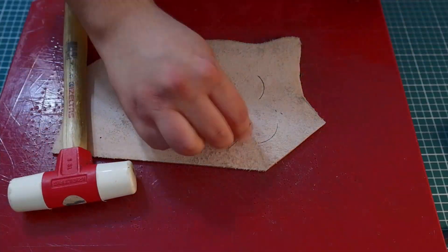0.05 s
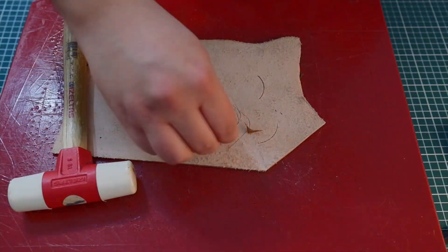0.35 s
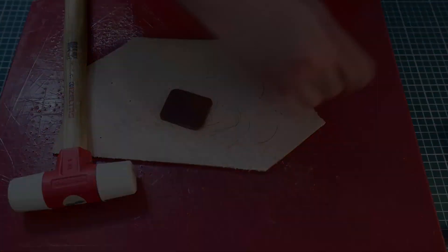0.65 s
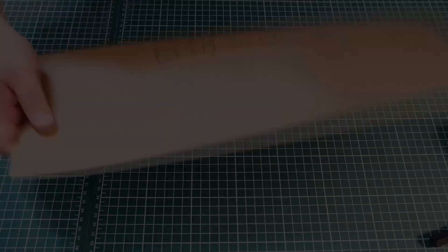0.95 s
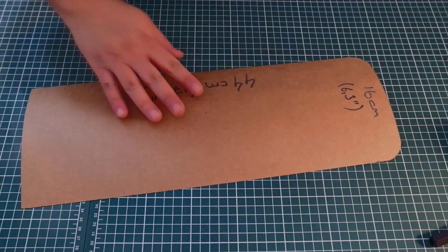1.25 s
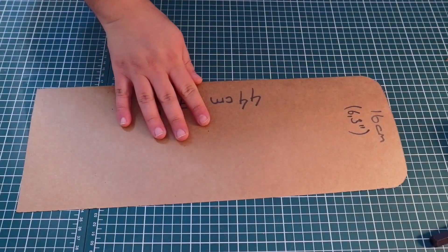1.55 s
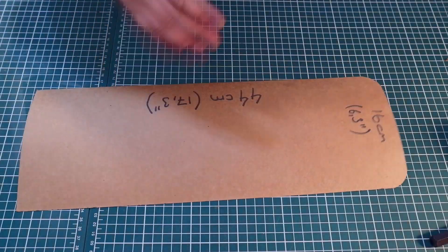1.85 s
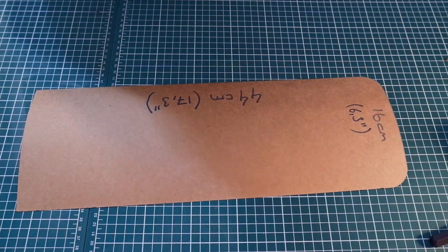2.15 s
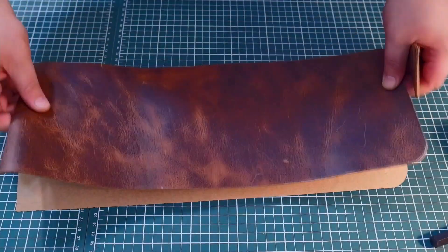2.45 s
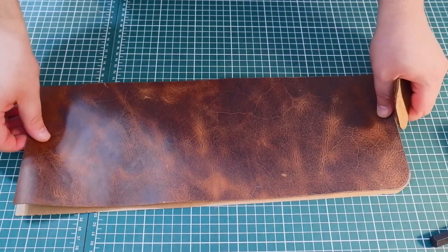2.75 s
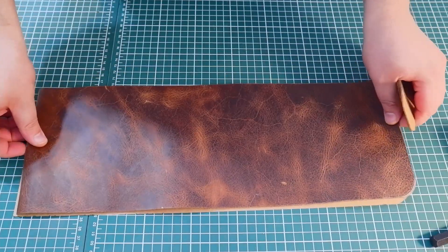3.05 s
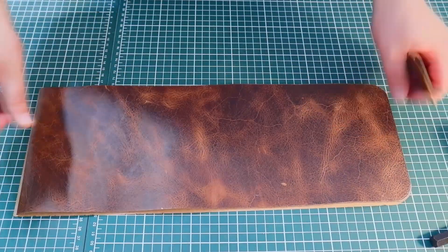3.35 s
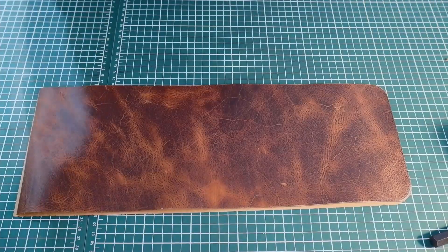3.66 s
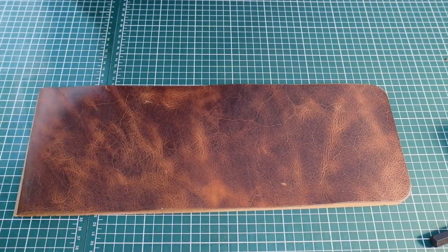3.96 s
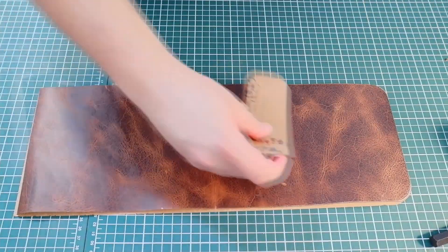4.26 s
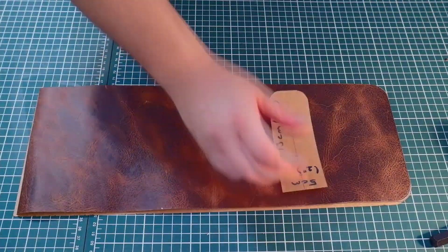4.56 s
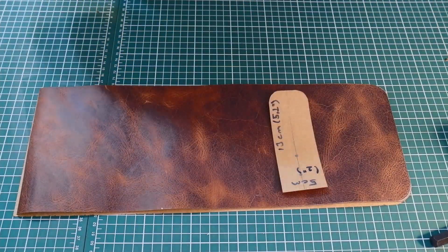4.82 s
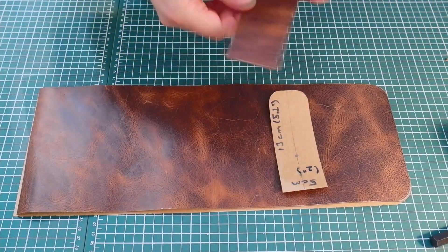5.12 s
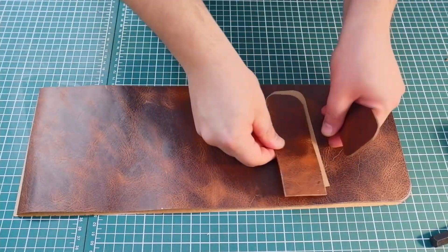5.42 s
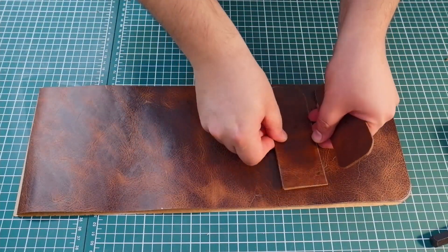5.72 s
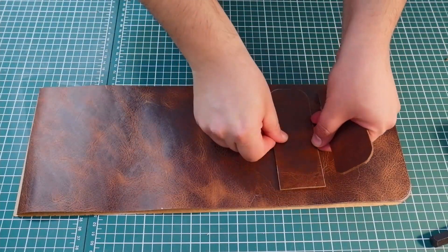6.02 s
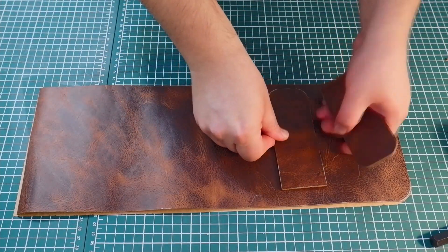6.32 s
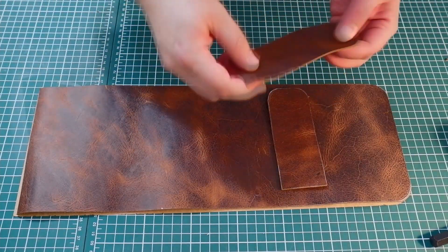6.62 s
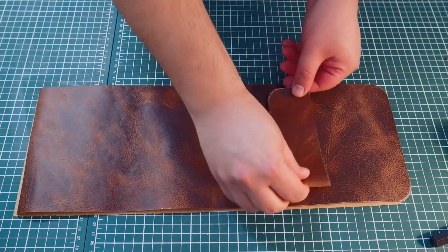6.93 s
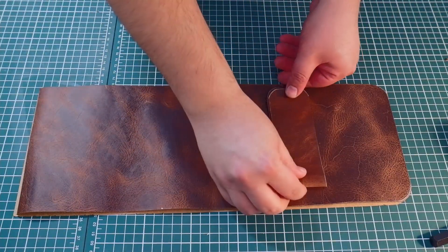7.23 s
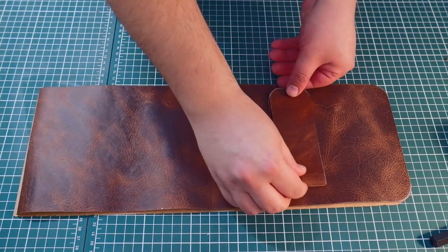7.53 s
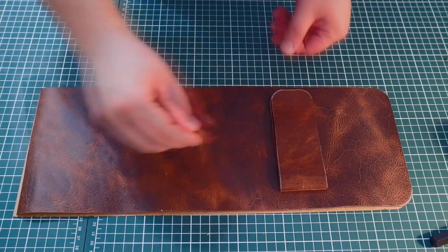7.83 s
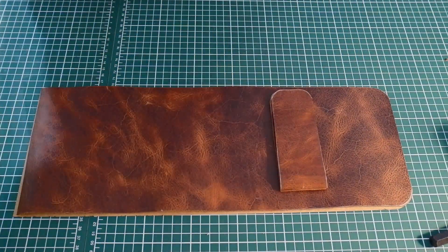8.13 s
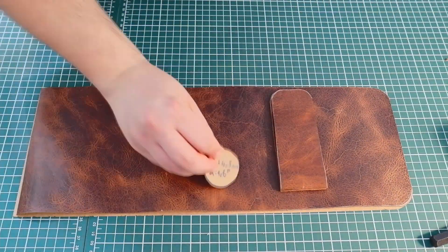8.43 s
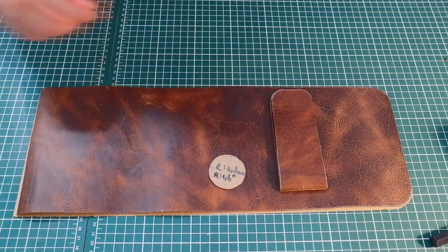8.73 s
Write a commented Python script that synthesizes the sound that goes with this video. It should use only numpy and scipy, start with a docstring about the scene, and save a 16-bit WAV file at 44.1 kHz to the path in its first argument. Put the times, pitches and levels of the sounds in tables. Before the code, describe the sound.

Soft scratching, one sharp slap of card, then quiet taps and rubs of leather and a small bright snap, over hiss and hum.

```python
"""At a leather workbench in a small room, an awl scratches lines on a cutting board.
A stiff card pattern slaps onto the mat, rings briefly and is slid into place. Leather pieces are laid
on it, nudged and smoothed with small taps, and a little card disc snaps down from the fingers.
Slides are fibres catching and letting go; each touch is a quick cluster of tiny hits.
Steady microphone hiss and a low hum lie under it all, spread wide between left and right."""
import sys
import numpy as np
from scipy import signal
from scipy.fft import rfft, irfft, next_fast_len
from scipy.io import wavfile
from scipy.ndimage import map_coordinates

SR = 44100
rng = np.random.default_rng(int(sys.argv[2]) if len(sys.argv) > 2 else 0)


def file_out(sig):
    """Save sig as 16-bit WAV at sys.argv[1]."""
    # one column per channel
    cols = np.atleast_2d(sig).T
    # limit, then scale
    lim = np.clip(cols, -1, 1)
    pcm = np.round(lim * 32767).astype(np.int16)
    wavfile.write(sys.argv[1], SR, pcm)


N = 396018

# tone colour (how strong each pitch is) of the background hiss: f/Hz, level/dB
HISS_COLOUR = [(20, -7.5), (60, -5.5), (125, 0), (160, 0.5), (225, 0), (400, -3), (700, -6), (1300, -9),
               (2000, -11), (5000, -12), (8700, -13.5), (9600, -14.5), (15800, -14)]
# how the low hum comes and goes: t/s, level/dB
HUM_LEVELS = [(0, -60.5), (.5, -62), (.75, -87), (2.05, -68.5), (3.3, -86), (4.1, -63.5), (4.8, -79.5),
              (5.4, -67.5), (6.1, -68), (6.7, -76.5), (9, -70)]
# hands and pieces thump the bench top: t/s, f/Hz, level/dB
BUMPS = [(.012, 229, -52.5), (.12, 34, -62), (0.929, 190, -48.5), (1.101, 104, -55), (1.189, 198, -58),
         (2.317, 387, -52.5), (2.812, 433, -57), (3.217, 413, -51.5), (3.283, 298, -46.5), (3.93, 207, -57),
         (4.158, 110, -60), (5.447, 330, -54), (5.767, 338, -57.5), (5.99, 330, -56), (6.213, 290, -57),
         (8.196, 100, -56.5), (8.25, 300, -55.5), (8.684, 69, -68)]
# the awl, a sheet or a hand slides: fastest t/s, half length/s, level/dB, brightness/dB, ring f/Hz
STROKES = [(0.179, 0.35, -54.5, 16, 4070), (0.249, 0.57, -59, -22, 524), (.569, 0.078, -55.5, 8, 2550),
           (0.818, 0.16, -56.5, 0, 4200), (.985, 0.095, -52, -8, 620), (1.136, 0.076, -38.5, -3, 1130),
           (1.199, .12, -36.5, -13, 790), (1.378, .042, -35.5, -10, 1150),
           (1.409, 0.063, -32.5, -1.5, 2160), (1.457, .06, -35, -3, 2530), (1.924, .16, -54, -13, 1390),
           (2.285, 0.17, -54.5, 4, 695), (2.61, .11, -44.5, -16, 910), (2.73, .16, -51, -3, 1080),
           (2.904, 0.088, -54, -1, 1120), (3.121, .09, -50, -5, 1170), (3.667, 0.11, -55.5, 0, 3000),
           (3.852, .22, -48.5, 18, 4800), (3.919, .14, -46.5, -9, 2160), (4.028, 0.063, -48, 0, 940),
           (4.218, 0.14, -47, 16, 13500), (4.463, .14, -46.5, 11.5, 3230), (4.519, 0.078, -48, 5, 8500),
           (4.642, 0.24, -59.5, 6, 7000), (5.513, 0.47, -60.5, 10, 1200), (6.66, 0.24, -58.5, 14, 13500),
           (7.655, 0.079, -53.5, -7, 1340), (8.137, 0.099, -51, -2, 4500), (8.25, 0.26, -55.5, -6, 1040),
           (8.254, .1, -46.5, 19, 13300)]
# tone colour of sliding: f/Hz, level/dB
SLIDE_COLOUR = [(180, -55), (300, -9), (461, -16), (922, -2.5), (1490, -0.5), (1590, -2.5), (1780, -2),
                (2140, -1.5), (3450, -2), (3870, -4), (5660, -4.5), (7250, -6.5), (8990, -8), (10800, -19),
                (15500, -19)]
# light, edgy contacts favour treble, flat, padded ones bass: f/Hz, share of the brightness added there
BRIGHTNESS_TILT = [(500, -0.55), (6000, .45), (12000, 0.63)]
# fingers, card and leather touch down: t/s, level/dB, brightness/dB, ring f/Hz
TAPS = [(.925, -45, -13.5, 597), (1.157, -35, -8, 1610), (1.219, -36.5, -21, 1550), (1.53, -51, 2, 1580),
        (1.617, -54.5, 9, 3000), (2.092, -51.5, 2, 950), (2.14, -54, 0, 1570), (2.452, -52, 1, 447),
        (2.579, -46, -16, 920), (2.858, -50, -2, 1020), (3.006, -48.5, -16, 910), (3.151, -42, -16.5, 1240),
        (3.281, -40, -3, 630), (3.976, -47.5, -4, 740), (4.113, -47.5, -4, 1630), (4.153, -37, -1, 2660),
        (4.286, -51, -2, 5400), (4.399, -44, -6, 2740), (5.488, -54.5, -3, 1300), (5.566, -54.5, -5, 1500),
        (5.989, -54.5, 2, 380), (6.088, -54, -3, 320), (6.186, -54, 12, 4100), (6.279, -55, 7, 1080),
        (6.403, -56.5, -1, 1280), (6.62, -54, 16, 2930), (7.314, -53, -15, 3170), (8.274, -42, 17, 4020),
        (8.524, -44, -3.5, 3230)]
# tone colour of a tap: f/Hz, level/dB
TAP_COLOUR = [(35, -41), (60, -6), (394, -6.5), (1020, 2.5), (1420, 1), (1630, -2.5), (1910, 2),
              (2150, -2.5), (2980, 1), (3760, -3.5), (4320, -2.5), (6560, -5), (8870, -4), (10900, -10.5),
              (15500, -19)]
# borders between four bands, called thud, knock, tap and tick from low to high: f/Hz
BAND_EDGES = [450, 1500, 4500]
# the card lands edge first, then flat: t/s, time to fade 60 dB/s, thud/dB, knock/dB, tap/dB, tick/dB
CARD_HITS = [(1.0674, 0.078, -48, -37, -41, -51), (1.075, 0.053, -41.5, -27.5, -33.5, -28.5),
             (1.0842, 0.044, -51, -27.5, -29.5, -37)]
# tone colour of the card: f/Hz, level/dB
CARD_COLOUR = [(60, -30), (110, -16), (220, -12), (480, -20), (820, 7), (1150, 1), (1500, -12), (2700, -13),
               (4000, -28), (5200, -19), (6300, -9), (7400, -22), (8400, -14), (10500, -28), (15500, -30)]
# the card's two flat blows on the mat: t/s, level/dB
CARD_BLOWS = [(1.0768, -25.5), (1.0878, -25)]
# tones that card and mat ring with: f/Hz, level/dB added to the blow's, time to fade 60 dB/s
CARD_TONES = [(608, -16, .09), (800, -1, .06), (915, 0, .062), (1100, -3, .055), (1170, -8, .05),
              (1645, -12, .06), (2100, -14, .07), (2660, -11, .06), (5190, -15, .08), (6200, -12, .06),
              (8180, -16, .07)]
# the disc slips, snaps down and settles: t/s, time to fade 60 dB/s, thud/dB, knock/dB, tap/dB, tick/dB
DISC_HITS = [(8.569, 0.062, -70, -69, -44, -45), (8.5795, 0.063, -60, -40.5, -36, -28.5),
             (8.584, 0.044, -39.5, -41, -59, -41), (8.588, 0.094, -50.5, -66, -43, -40),
             (8.6, 0.11, -49, -60, -50, -57)]
# tone colour of the disc: f/Hz, level/dB
DISC_COLOUR = [(60, -22), (120, 4), (420, -11), (640, -14), (880, 7), (1200, -23), (1800, -10.5),
               (2900, -22), (4250, 0.5), (5200, -2), (8000, 4), (12000, -5), (14300, 3), (15800, -9)]
# how long the room echoes: f/Hz, time to fade 60 dB/s
ROOM_FADE = [(150, 0.12), (1000, 0.3), (12000, 0.18)]

TOP_HZ = 15800  # upper limit of the treble
LEAD_S = 0.025  # a contact starts this long before its peak
GRAIN_DB = 2.3  # unevenness from fibre to fibre


def amp(db):
    """Turn decibels into a factor to multiply by."""
    return 10 ** (np.asarray(db) / 20)


def rms(x):
    """The average strength (root mean square) of each channel."""
    return np.sqrt(np.mean(x ** 2, axis=-1, keepdims=True) + 1e-30)


def unit(x):
    """Scale each channel to an average strength of 1."""
    return x / rms(x)


def along(points, hz):
    """Read between the rows of a (frequency, value) table, with octaves evenly spaced."""
    freqs, values = np.transpose(points)
    return np.interp(np.log(hz + 1), np.log(freqs + 1), values)


def wobble(n, rate):
    """A smooth curve, n samples long, through `rate` random points a second."""
    points = rng.standard_normal(int(n * rate / SR) + 4)
    return map_coordinates(points, [np.arange(n) * rate / SR])


def filtered(x, response):
    """Make each frequency in x louder or softer by the factor response(hz)."""
    n = x.shape[-1]
    size = next_fast_len(n + 4096)
    return irfft(rfft(x, size) * response(np.fft.rfftfreq(size, 1 / SR)), size)[..., :n]


def add(track, s, sound):
    """Mix a stereo sound into the track, starting at s seconds."""
    start = max(round(s * SR), 0)
    part = sound[:, :N - start]
    track[:, start:start + part.shape[1]] += part


def tinted(base, bright_db, ring_hz, ring_db, ring_octaves):
    """A material's tone colour, made brighter or duller, with a peak where it rings."""
    def colour(hz):
        peak = ring_db / (1 + (np.log2((hz + 1) / ring_hz) / ring_octaves) ** 2)
        return along(base, hz) + bright_db * along(BRIGHTNESS_TILT, hz) + peak
    return colour


def background(hiss_db, hum_hz, hum_width_hz, waver_db):
    """Room murmur and microphone hiss, unrelated left and right, with a fuzzy, wavering hum."""
    hiss = filtered(rng.standard_normal((2, N)), lambda hz: amp(along(HISS_COLOUR, hz)) * (hz < TOP_HZ))
    hum = filtered(rng.standard_normal((2, N)), lambda hz: 1 / (1 + ((hz - hum_hz) / hum_width_hz) ** 2))
    hum_db = np.interp(np.arange(N) / SR, *np.transpose(HUM_LEVELS)) + waver_db * wobble(N, 12)
    return amp(hiss_db) * unit(hiss) + amp(hum_db) * unit(hum)


def bumps(relative_width, swell_cycles):
    """Soft pressure on the bench top makes a swell of low noise: the lower, the longer."""
    out = np.zeros((2, N))
    t = np.arange(SR // 2) / SR
    for s, centre_hz, db in BUMPS:
        start = max(s - t[-1] / 2, 0)
        band = lambda hz: 1 / (1 + ((hz / centre_hz - 1) / relative_width) ** 4)
        rumble = filtered(rng.standard_normal((2, len(t))), band)
        swell = np.exp(-((start + t - s) * centre_hz / swell_cycles) ** 2 / 2)
        add(out, start, amp(db) * unit(swell * rumble) * rms(swell))
    return out


def sliding(judder_db, judder_hz, grip_db):
    """Fibres catch and let go under each stroke; the sheet judders and every grip colours it anew."""
    out = np.zeros((2, N))
    grip_hz = np.geomspace(400, 16000, 90)
    for fastest, half_length, db, bright_db, ring_hz in STROKES:
        t = np.arange(-min(half_length, fastest), half_length, 1 / SR)
        n = len(t)
        speed = np.exp(-np.abs(t / (0.33 * half_length)) ** 1.84)  # speeds up, then slows down
        noise = rng.standard_normal((2, n))
        fibres = noise * amp(GRAIN_DB * wobble(n, 1500) + judder_db * wobble(n, judder_hz))
        grip = np.c_[grip_hz, grip_db * rng.standard_normal(len(grip_hz))]
        colour = tinted(SLIDE_COLOUR, bright_db, ring_hz, ring_db=8.5, ring_octaves=0.31)
        rub = unit(filtered(fibres, lambda hz: amp(colour(hz) + along(grip, hz))))
        add(out, fastest - min(half_length, fastest), amp(db) * speed * rub)
    return out


def split_bands(x, colour):
    """Colour x and split it into four overlapping, equally strong bands, low to high."""
    def response(hz):
        below = [0 * hz] + [1 / (1 + (hz / edge) ** 10) for edge in BAND_EDGES] + [0 * hz + 1]
        bands = np.sqrt(np.abs(np.diff(below, axis=0)))
        return (bands * amp(colour(hz)))[:, None]
    return unit(filtered(x, response))


def band_shares(colour):
    """How a tone colour shares its power among the four bands, in dB."""
    hz = np.arange(20, TOP_HZ, 20)
    power = np.bincount(np.searchsorted(BAND_EDGES, hz), amp(colour(hz)) ** 2)
    return 10 * np.log10(power / power.sum())


def contact(colour, fade_s, band_db, rise_s, hold_s, thud_stretch):
    """A sheet touches down: a cluster of tiny hits swells, holds for an instant and dies away."""
    t = np.arange(SR // 4) / SR - LEAD_S
    grains = rng.standard_normal((2, len(t))) * amp(GRAIN_DB * wobble(len(t), 1180))
    fades = fade_s * np.array([thud_stretch, 1, 1, 1])[:, None, None]  # the bench holds the thud longer
    drop = np.maximum(-t / rise_s, (t - hold_s) / fades)
    loudness = amp(-60 * np.maximum(drop, 0))
    bursts = unit(split_bands(grains, colour) * loudness) * rms(loudness)
    return np.tensordot(amp(band_db), bursts, 1)


def taps():
    """Each touch rings at a pitch set by the piece and where it is held; flat ones are dull and long."""
    out = np.zeros((2, N))
    for s, db, bright_db, ring_hz in TAPS:
        colour = tinted(TAP_COLOUR, bright_db, ring_hz, ring_db=10, ring_octaves=0.13)
        softness = 2 ** (-bright_db / 46)  # 46 dB brighter is half as long
        touch = contact(colour, fade_s=0.069 * softness, band_db=db + band_shares(colour),
                        rise_s=0.03 * softness, hold_s=0.0014, thud_stretch=1.35)
        add(out, s - LEAD_S, touch)
    return out


def card_slap(ring_rise_s, phase_spread_rad):
    """The card crackles down, and each flat blow rings it on the mat, out of step left and right."""
    out = np.zeros((2, N))
    colour = lambda hz: along(CARD_COLOUR, hz)
    for s, fade_s, *band_db in CARD_HITS:
        crackle = contact(colour, fade_s, band_db, rise_s=0.032, hold_s=0.0028, thud_stretch=3.6)
        add(out, s - LEAD_S, crackle)
    t = np.arange(SR // 5) / SR
    for hz, tone_db, fade_s in CARD_TONES:
        phase = phase_spread_rad * rng.standard_normal((2, 1))
        loudness = amp(-60 * t / fade_s) * (1 - np.exp(-t / ring_rise_s))
        ring = loudness * np.sin(2 * np.pi * hz * t + phase)
        for s, blow_db in CARD_BLOWS:
            add(out, s, amp(blow_db + tone_db) * ring)
    return out


def disc_snap():
    """The small stiff disc gives a bright double click with a hollow pop of trapped air."""
    out = np.zeros((2, N))
    colour = lambda hz: along(DISC_COLOUR, hz)
    for s, fade_s, *band_db in DISC_HITS:
        click = contact(colour, fade_s, band_db, rise_s=0.011, hold_s=0.00048, thud_stretch=1.3)
        add(out, s - LEAD_S, click)
    return out


def room_echo(x):
    """A short, blurred echo, different on each side; the middle pitches last longest."""
    hz, t, noise = signal.stft(rng.standard_normal((2, SR // 3)), SR, nperseg=256)
    fade = amp(-60 * t / along(ROOM_FADE, hz)[:, None])
    _, tail = signal.istft(noise * fade, SR, nperseg=256)
    return signal.fftconvolve(x, tail / np.linalg.norm(tail[0]), axes=1)[:, :N]


def scene():
    """All the work on the bench, with its echo, over the hiss and hum."""
    bench = card_slap(ring_rise_s=0.0008, phase_spread_rad=0.55) + disc_snap() + taps()
    bench += sliding(judder_db=1.5, judder_hz=110.6, grip_db=3.5)
    bench += bumps(relative_width=0.3, swell_cycles=2.8)
    echo = amp(-16) * room_echo(bench)
    return bench + echo + background(hiss_db=-56.5, hum_hz=306, hum_width_hz=23.4, waver_db=4.0)


def record(dry):
    """Cut away the very highest treble."""
    return filtered(dry, lambda hz: hz < TOP_HZ)


dry = scene()
out = record(dry)
file_out(out)
```